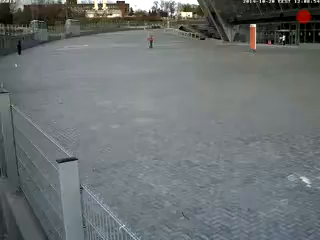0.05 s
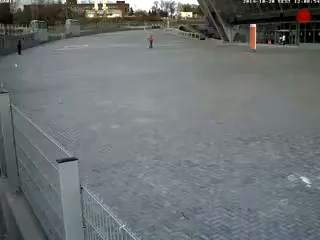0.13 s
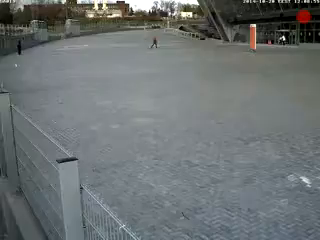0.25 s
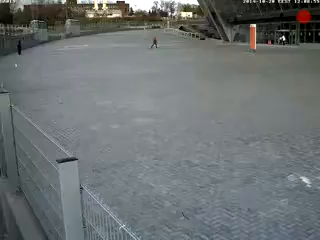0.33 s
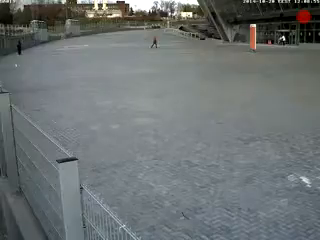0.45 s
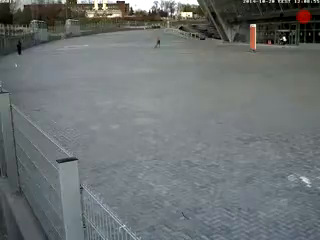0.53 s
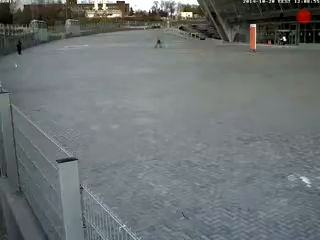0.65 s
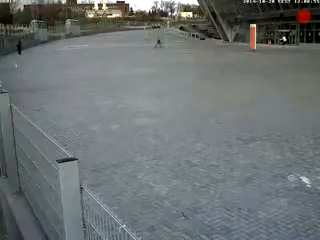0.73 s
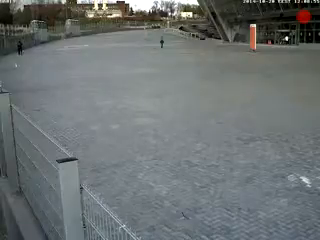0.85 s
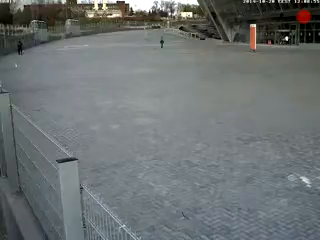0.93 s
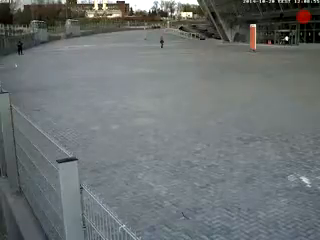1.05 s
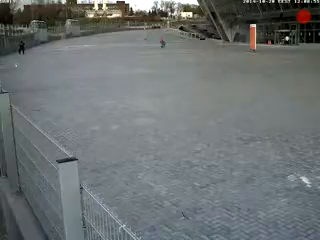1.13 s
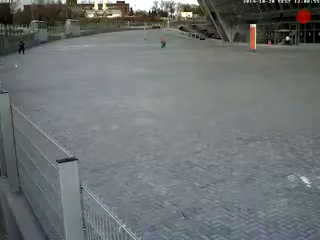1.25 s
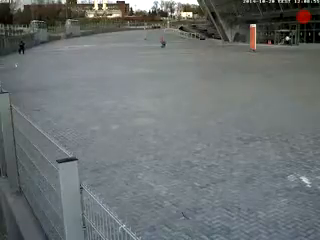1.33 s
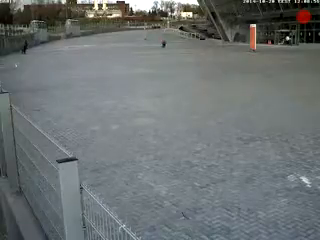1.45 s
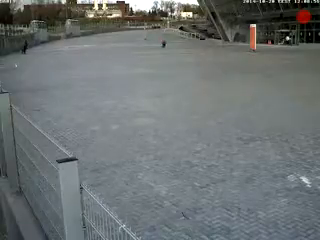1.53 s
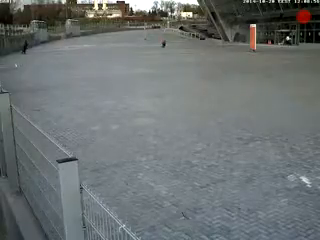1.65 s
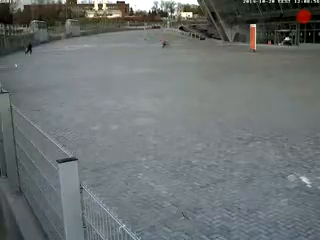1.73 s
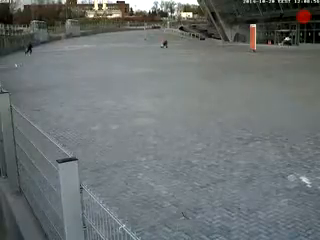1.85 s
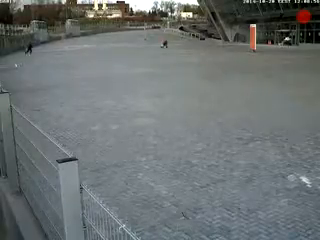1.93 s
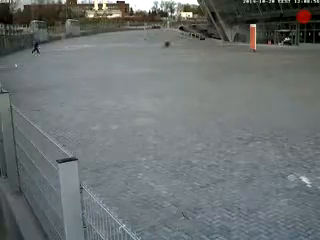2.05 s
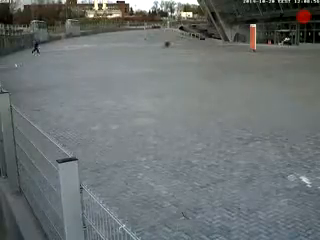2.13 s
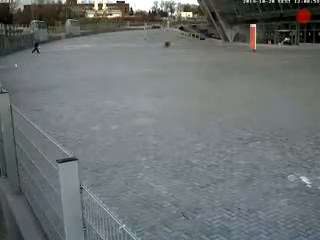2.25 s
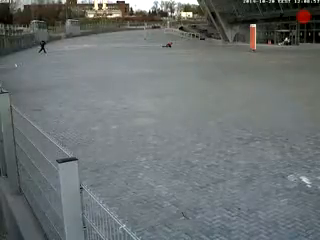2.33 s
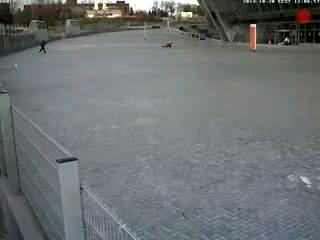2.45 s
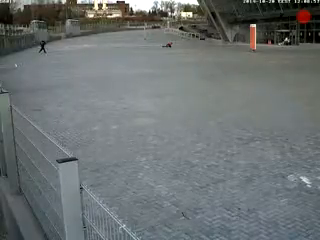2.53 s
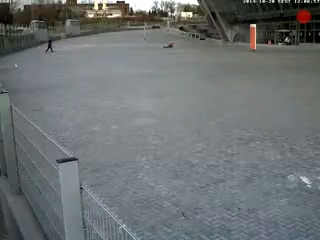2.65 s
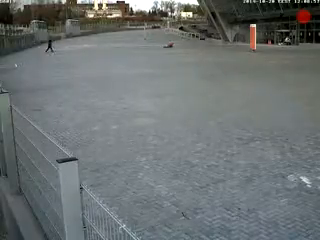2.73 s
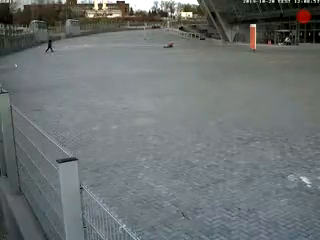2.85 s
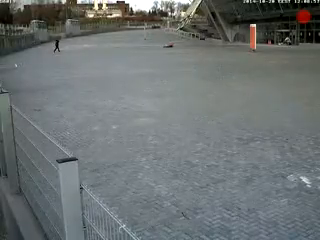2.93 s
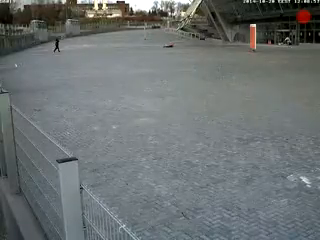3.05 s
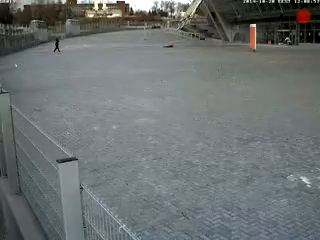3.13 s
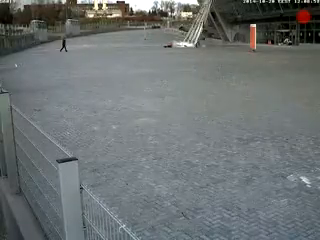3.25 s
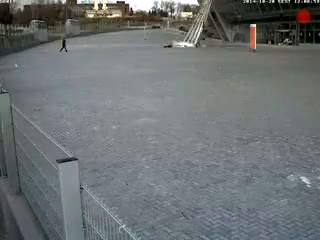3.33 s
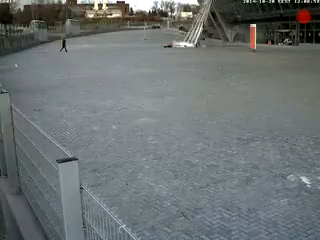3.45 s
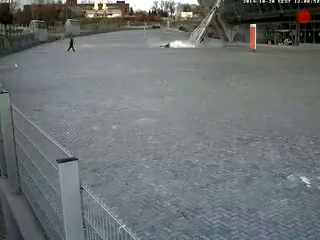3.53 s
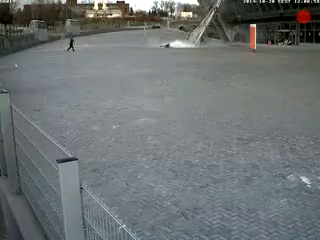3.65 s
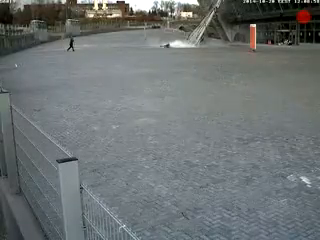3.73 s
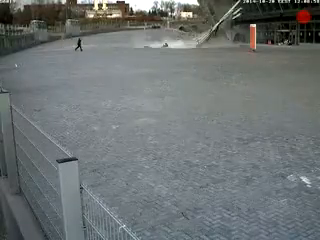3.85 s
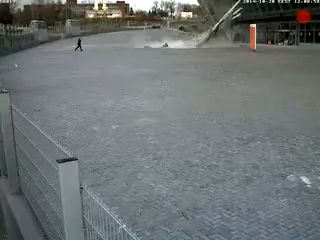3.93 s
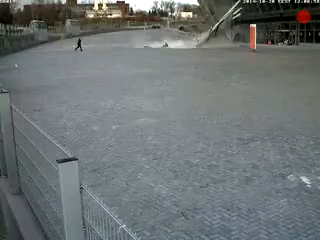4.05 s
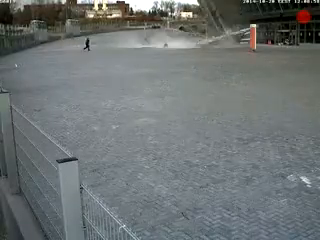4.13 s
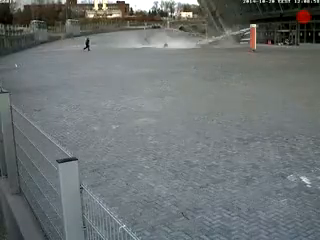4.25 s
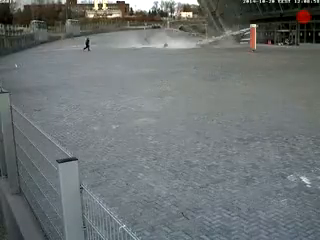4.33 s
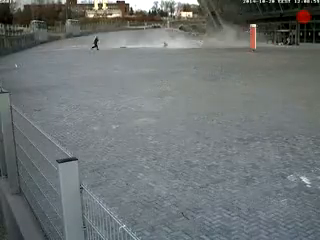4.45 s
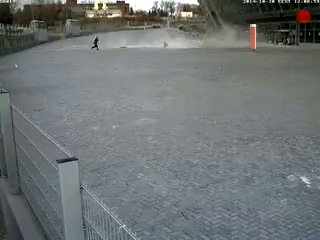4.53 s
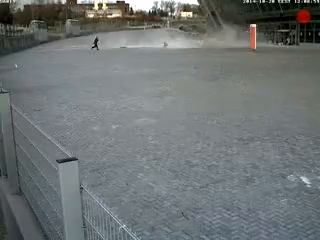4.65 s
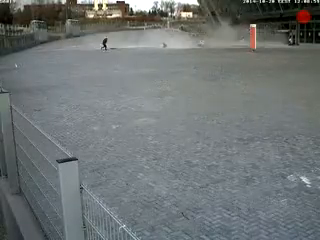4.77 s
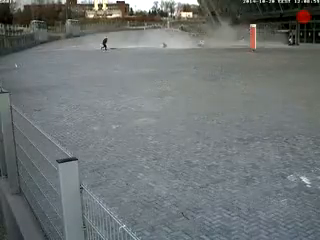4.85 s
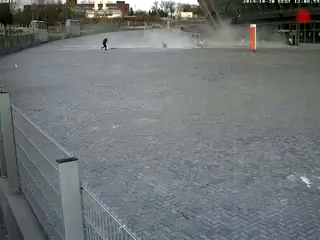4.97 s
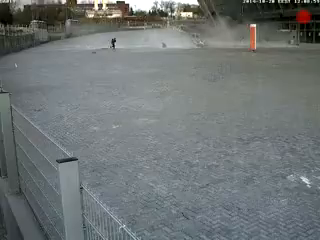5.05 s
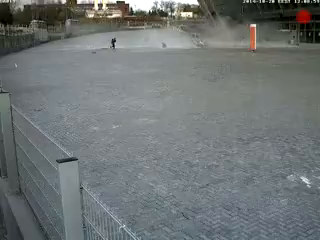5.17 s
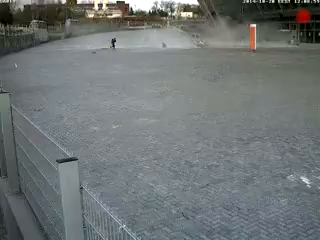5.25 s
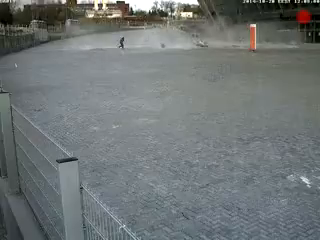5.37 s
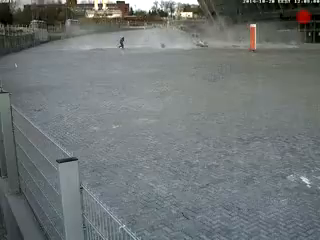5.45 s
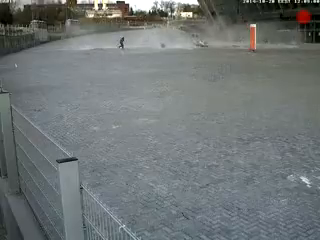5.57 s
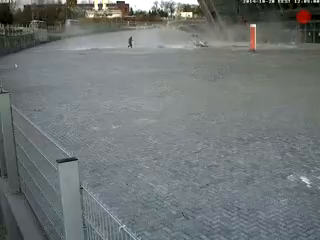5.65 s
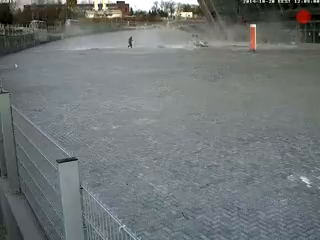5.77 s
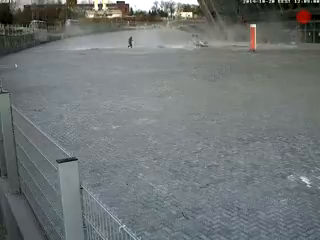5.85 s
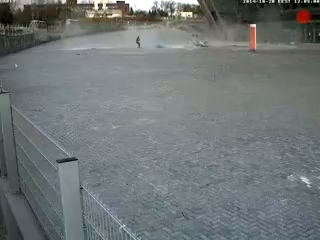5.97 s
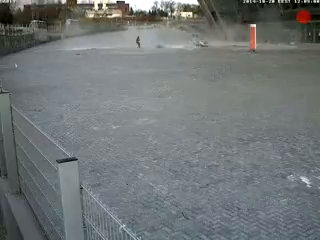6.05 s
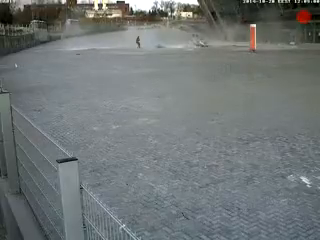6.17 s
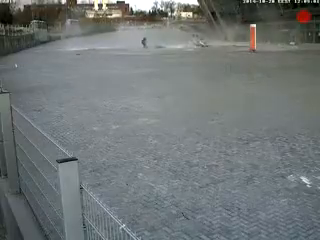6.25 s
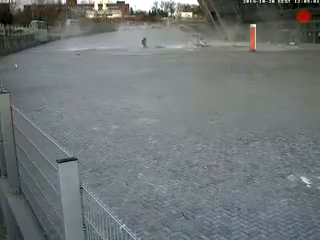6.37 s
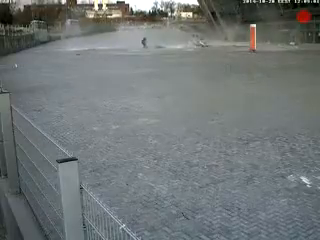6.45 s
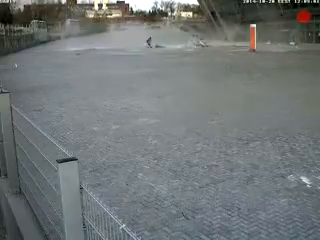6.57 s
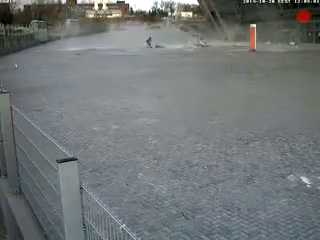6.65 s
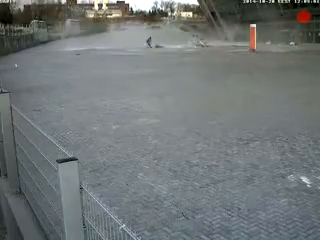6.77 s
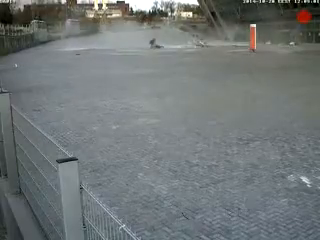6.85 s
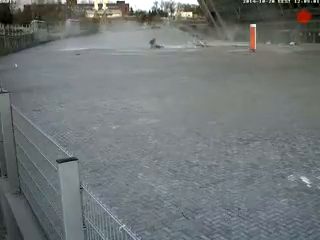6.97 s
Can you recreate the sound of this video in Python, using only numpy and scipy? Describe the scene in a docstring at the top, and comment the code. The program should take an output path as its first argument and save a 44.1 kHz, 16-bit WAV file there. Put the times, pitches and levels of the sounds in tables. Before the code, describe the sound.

Booming, clanging collapse of metal beams and glass, harshly clipped, thinning to clatter, crashing twice more before dying away over distant town noise.

```python
"""On a wide paved square, a steel and glass structure tears loose and falls near an overloaded microphone.
Heavy members boom, beams and panels clang, shards shatter: random blows and noise set resonators ringing.
Single pieces strike and rattle out of the roar, and the facades answer them with a diffuse tail.
Behind it lies the even murmur of a distant town, made the same way as the debris.
The narrow-band microphone channel saturates, drops out for instants and is clipped again afterwards."""
import sys
import numpy as np
from scipy import signal
from scipy.fft import rfft, irfft, next_fast_len
from scipy.io import wavfile
from scipy.ndimage import uniform_filter1d

SR = 44100
rng = np.random.default_rng(int(sys.argv[2]) if len(sys.argv) > 2 else 0)


def wrap_up_sound(samples):
    """Save the sound to the file named by the first command line argument, as 16-bit audio."""
    columns = np.atleast_2d(samples).T
    # keep every value between -1 and 1, then stretch to whole-number steps
    tamed = np.clip(columns, -1, 1)
    steps = np.round(tamed * 32767).astype(np.int16)
    wavfile.write(sys.argv[1], SR, steps)


N = 308832
T = np.arange(N) / SR  # time in seconds

# sections that give way one after another; columns:
# start t/s, swell t/s, hold t/s, basic fade/(dB/s), then boom, beams, panels, shards level/dB
SECTIONS = [(0, 0.0017, 0.12, 38, -9.5, -8.5, -17, -21), (0.111, 0.12, 0.19, 112, -13.5, -11, -17, -18.5),
            (0.405, 0.059, 0.051, 301, -6.5, -11.5, -21, -23),
            (0.494, 0.11, 0.16, 113, -9.5, -11.5, -21, -22.5),
            (0.819, 0.06, 0.074, 43.5, -9.5, -11, -20, -22.5),
            (0.961, 0.065, 0.13, 252, -18, -13.5, -22, -23), (1.175, 0.022, 0.3, 62, -21, -18, -27, -32.5),
            (1.226, 0.013, 0.036, 113, -15.5, -15, -22.5, -26),
            (1.324, 0.033, .02, 302, -11.5, -17.5, -21, -26),
            (1.435, 0.028, 0.064, 7, -17.5, -15, -21.5, -27.5),
            (1.497, .07, 0.035, 37, -27, -13.5, -22, -18),
            (1.674, 0.069, 0.19, 125, -23.5, -14.5, -27, -40),
            (2.088, 0.015, 0.011, 123, -20.5, -16, -35, -34),
            (2.425, 0.027, 0.19, 27, -19.5, -19, -26.5, -27), (2.6, 0.089, .2, 60, -22.5, -20.5, -27, -26),
            (2.783, 0.036, 0.018, 203, -18, -30, -34, -35),
            (3.052, 0.0047, 0.08, 16, -20.5, -10, -25, -25.5),
            (3.055, 0.069, 0.45, 94, -22, -11, -13.5, -15), (3.45, .03, 0.049, 100, -28, -16, -20, -21),
            (3.56, 0.055, .45, 9.5, -27.5, -14, -19.5, -20.5),
            (4.045, 0.088, .12, 38, -11, -10.5, -17, -18.5), (4.14, 0.14, .05, 14.5, -20.5, -10, -16, -20),
            (4.705, 0.024, 0.026, 60, -28, -17, -27, -22.5),
            (4.945, .02, 0.056, 62, -36, -14.5, -19, -23.5), (4.993, 0.11, 0.1, 26, -34, -16, -20, -27.5),
            (5.5, 0.081, 0.2, 36, -37, -26, -40.5, -39.5)]
# how much faster than the section's basic fade each part dies: boom, beams, panels, shards [factor]
FADE_FACTORS = [1.12, 0.8, 0.96, 0.93]
# tone colours of the falling parts; columns: f/Hz, relative level/dB per Hz
BOOM_COLOUR = [(50, -34.5), (90, -29.5), (150, -1.5), (230, 1.5), (400, 0.5), (600, -4), (800, -22)]
BEAM_COLOUR = [(350, -9.5), (550, -5.5), (850, 0), (1100, -1), (1500, -2.5), (1900, -13), (2400, -30)]
PANEL_COLOUR = [(1300, -15.5), (1700, 1), (2100, 3), (2600, 0), (2950, -3.5), (3300, -25)]
SHARD_COLOUR = [(2800, -23), (3100, 3.5), (3300, 5.5), (3550, 2.5), (3800, -5.5), (4200, -25)]
# single pieces that strike and ring out of the roar; columns:
# start t/s, peak level/dB before the echo, centre f/Hz, ring time to -60 dB t/s, rattle decay t/s
STRIKES = [(0.021, -2.5, 149, 0.07, 0.19), (.72, -3, 173, 0.18, 0.055), (1.235, 0.5, 782, 0.066, 0.012),
           (1.35, -6, 606, .08, 0.013), (1.52, 0.5, 842, 0.077, 0.017), (2.025, 2.5, 1723, 0.023, 0.0031),
           (2.116, -8, 820, .012, 0.0032), (2.55, -9, 267, .07, 0.0091), (2.616, -6, 1080, 0.036, 0.0044),
           (2.662, -10, 3530, 0.04, 0.0036), (2.77, -4.5, 584, 0.018, .003), (2.835, 4, 450, 0.021, 0.0018),
           (2.9, -8, 2130, .015, .008), (3.055, -7, 1200, 0.024, .006), (3.062, 4.5, 908, 0.094, 0.03),
           (4.09, -6, 200, 0.034, 0.04), (4.174, -11, 220, .04, .01), (4.236, -5, 210, 0.052, 0.027),
           (4.09, 1, 806, .06, .05), (4.744, -1.5, 1264, 0.06, 0.028), (4.844, -15.5, 150, 0.057, .004),
           (4.99, -2, 1234, 0.065, 0.046), (5.06, -10, 827, 0.05, 0.22), (5.521, -7, 900, .012, 0.0025),
           (6.65, -31, 3320, .012, 0.061)]
# tone colour of the distant town; columns: f/Hz, relative level/dB per Hz
TOWN_COLOUR = [(60, -33), (110, -12), (200, 2), (400, 0), (900, -7.5), (1500, -10), (2500, -28),
               (3300, -25), (4000, -36.5)]
# moments when the sound drops out; columns: middle t/s, length at full depth t/s, level change/dB
DROPOUTS = [(0.451, 0.0075, -19), (0.468, .003, -13), (0.503, 0.012, -16.5), (0.626, 0.0073, -15),
            (0.642, 0.0026, -10), (.675, 0.0059, -9), (0.707, 0.0049, -15), (0.819, 0.0089, -4)]

STEEPEN_DB_PER_S2 = 1.5  # makes the fades speed up, before FADE_FACTORS
LAST_LANDING_S, SETTLE_S = 5.1, 0.7  # blows start to thin out, time until none are left
OVERLOAD_KNEE_DB, OVERLOAD_SWELL = -15, 0.8  # beam level where extra loudness starts, extra dB per dB
FACADE_T60_S, FACADE_DB = 0.2, -13  # echo time to -60 dB, echo level
TOWN_DB = -31.5
RAIL, CLIP, KNEE_SHARPNESS = 0.7, 0.68, 11.7  # amplitude limits of the first and second stage
VOICE_HZ, TOP_HZ = 3956, 15800  # top of the voice band, top of the final output
DULL_HZ, DULL_DB = 8840, -3.5  # treble above this pitch is turned down by this much


def roar():
    """Four kinds of debris follow the force of the fall, with an extra swell at the loudest moments."""
    boom_db, beams_db, panels_db, shards_db = collapse_db()
    beams = debris(BEAM_COLOUR, per_s=400, spread_db=4.0, cycles=12.34,
                   surge_db=0.5, surge_rate=20, wash_db=2.5)
    boom = debris(BOOM_COLOUR, per_s=150, spread_db=2.0, cycles=7.5,
                  surge_db=1.5, surge_rate=12, wash_db=2.0)
    panels = debris(PANEL_COLOUR, per_s=500, spread_db=3.0, cycles=17.2,
                    surge_db=1.5, surge_rate=25, wash_db=-1.0)
    shards = debris(SHARD_COLOUR, per_s=500, spread_db=5.5, cycles=37.3,
                    surge_db=0.5, surge_rate=23, wash_db=-0.5)
    parts = undb(beams_db) * beams + undb(boom_db) * boom
    parts += undb(panels_db) * panels + undb(shards_db) * shards
    # at full force the air carries far more than the microphone can pass
    overload_db = OVERLOAD_SWELL * np.maximum(beams_db - OVERLOAD_KNEE_DB, 0)
    flutter_db = 0.91 * walk(30) + 0.95 * walk(12)
    return parts * undb(overload_db + flutter_db)


def collapse_db():
    """Level of each part: every section swells, holds and fades ever faster, and their powers add."""
    power = np.full((4, N), 1e-9)  # a tiny floor keeps the logarithm finite
    for start, swell, hold, fade, *part_db in SECTIONS:
        first = int(start * SR)
        t = T[first:] - start
        after = np.maximum(t - swell - hold, 0)
        drop_db = np.outer(FADE_FACTORS, fade * after + STEEPEN_DB_PER_S2 * after ** 2)
        rise = np.clip(t / swell, 0, 1)
        level = rise * undb(np.array(part_db)[:, None] - drop_db)
        power[:, first:] += level ** 2
    return 10 * np.log10(power)


def debris(colour, per_s, spread_db, cycles, surge_db, surge_rate, wash_db, count=14):
    """Pieces of many sizes land at random over a wash of echoes; each size rings and surges on its own."""
    hz, db = np.transpose(colour)
    # once the last pieces are down only the smooth wash is left
    landing = np.clip(1 - (T - LAST_LANDING_S) / SETTLE_S, 0, 1)
    # the wash grows as the blows thin out, so the total power holds
    wash_level = np.sqrt(undb(2 * wash_db) + 1 - landing ** 2)
    out = 0
    for f in np.geomspace(hz[0], hz[-1], count):
        at = np.flatnonzero(rng.random(N) < per_s / SR)
        blow_db = spread_db * np.minimum(rng.exponential(size=len(at)), 4.5)
        blows = np.zeros(N)
        blows[at] = rng.choice([-1, 1], len(at)) * undb(blow_db)
        push = landing * unit(blows) + wash_level * rng.standard_normal(N)
        # two resonators in a row; each dies by 60 dB over the given number of cycles
        tone = unit(ring(ring(push, f, cycles / f), f, cycles / f))
        # 10 log f: the bands are spaced by ratio, so higher ones are wider
        weight_db = np.interp(np.log(f), np.log(hz), db) + 10 * np.log10(f)
        out = out + undb(weight_db + surge_db * walk(surge_rate)) * tone
    return unit(out)


def strikes():
    """Each piece rings on a close, beating cluster of three modes while it rattles to rest."""
    out = np.zeros(N)
    detunes = rng.standard_normal((len(STRIKES), 3))
    for (start, db, hz, t60, rattle), detune in zip(STRIKES, detunes):
        i = int(start * SR)
        t = T[:min(int((t60 + 5 * rattle) * SR), N - i)]
        contact = rng.standard_normal(len(t)) * np.exp(-t / rattle)
        sound = sum(ring(contact, hz * (1 + 0.027 * d), t60) for d in detune)
        out[i:i + len(t)] += undb(db) * sound / np.max(np.abs(sound))
    return facades(out)


def facades(x):
    """Direct sound plus a diffuse echo off the buildings: fading noise that starts after 8 ms."""
    t = T[:int(FACADE_T60_S * SR)]
    tail = rng.standard_normal(len(t)) * undb(-60 * t / FACADE_T60_S) * (t > 0.008)
    tail = tail / np.sqrt(np.sum(tail ** 2))
    return x + undb(FACADE_DB) * signal.fftconvolve(x, tail)[:N]


def town():
    """Even murmur of the distant town: mostly smooth noise through many short resonances."""
    murmur = debris(TOWN_COLOUR, per_s=970, spread_db=3.5, cycles=7.7,
                    surge_db=1.9, surge_rate=6, wash_db=13, count=20)
    return undb(TOWN_DB) * murmur


def undb(db):
    """Turn decibels into an amplitude factor."""
    return 10 ** (np.asarray(db) / 20)


def unit(x):
    """Scale to rms 1."""
    return x / np.sqrt(np.mean(x ** 2))


def walk(rate):
    """Random levels held 1 / rate s and smoothed twice; rms 1."""
    k = int(SR / rate)
    steps = np.repeat(rng.standard_normal(N // k + 1), k)
    smooth = uniform_filter1d(uniform_filter1d(steps, k), k)
    return unit(smooth[:N])


def ring(x, hz, t60):
    """One damped mode struck by x; a unit impulse starts it ringing at about amplitude 1."""
    r = np.exp(-np.log(1000) / (t60 * SR))  # shrink per sample
    w = 2 * np.pi * hz / SR  # turn per sample
    return signal.lfilter([0, np.sin(w)], [1, -2 * r * np.cos(w), r * r], x)


def scene():
    """Roar and single strikes over the murmur of the town, at one microphone."""
    return (roar() + strikes() + town())[None]


def record(dry):
    """The preamp saturates, the channel is voice-band, and a later stage clips and dulls the crackle."""
    x = RAIL * np.tanh(dry / RAIL)
    # each dropout slides in and out over 0.83 ms
    gap_db = sum(db * np.clip((length / 2 - np.abs(T - middle)) / 0.00083 + 1, 0, 1)
                 for middle, length, db in DROPOUTS)
    x = signal.sosfilt(signal.butter(2, 60, "high", fs=SR, output="sos"), x * undb(gap_db))
    x = signal.sosfilt(signal.cheby1(10, 0.3, VOICE_HZ, fs=SR, output="sos"), x)
    x = x / (1 + np.abs(x / CLIP) ** KNEE_SHARPNESS) ** (1 / KNEE_SHARPNESS)
    size = next_fast_len(N)
    hz = np.arange(size // 2 + 1) * SR / size
    dull_db = DULL_DB / (1 + np.exp((DULL_HZ - hz) / 120.0))
    x = irfft(rfft(x, size) * undb(dull_db), size)[:, :N]
    return signal.sosfilt(signal.ellip(8, 0.2, 70, TOP_HZ, fs=SR, output="sos"), x)


dry = scene()
out = record(dry)
wrap_up_sound(out)
```